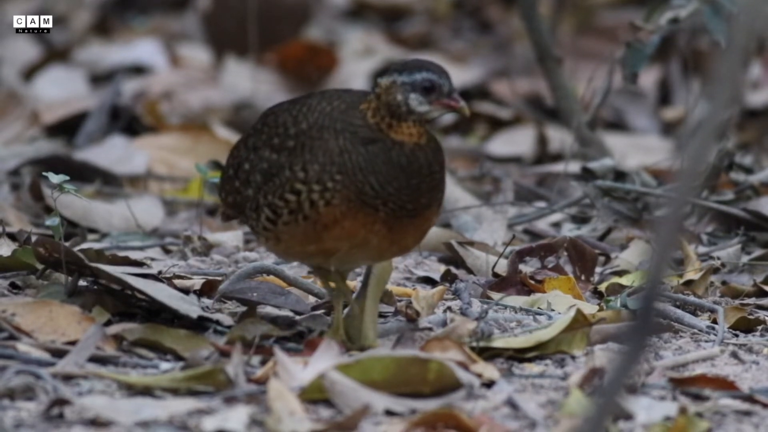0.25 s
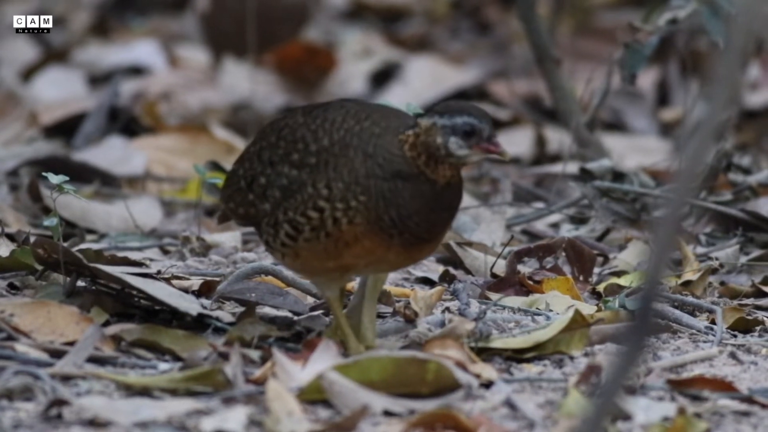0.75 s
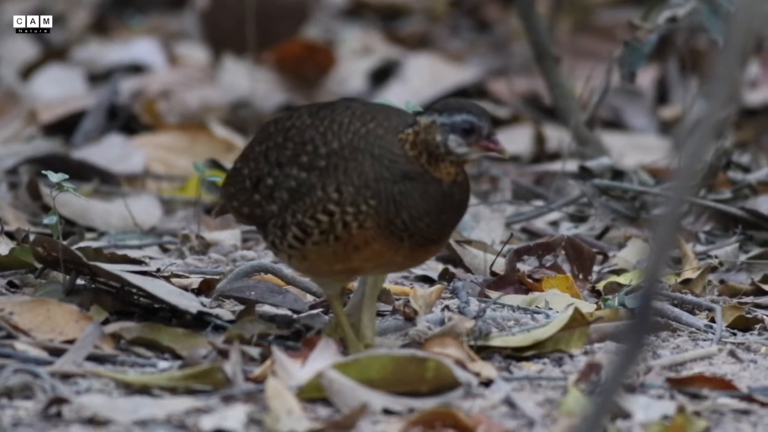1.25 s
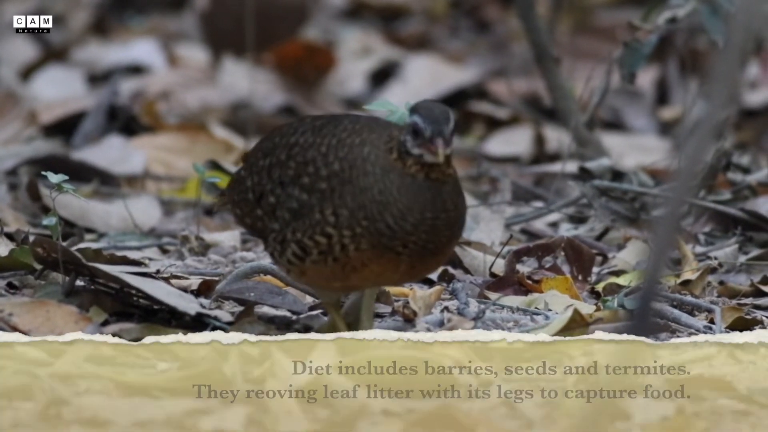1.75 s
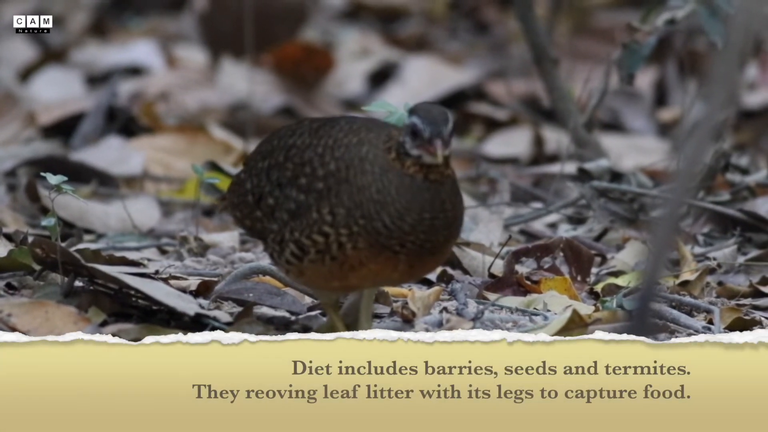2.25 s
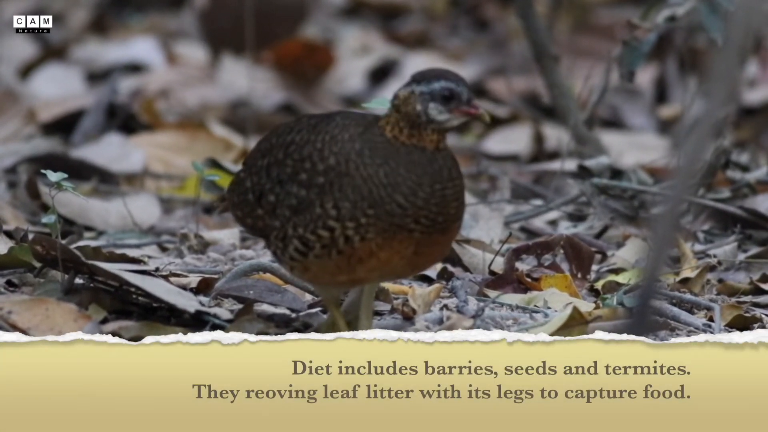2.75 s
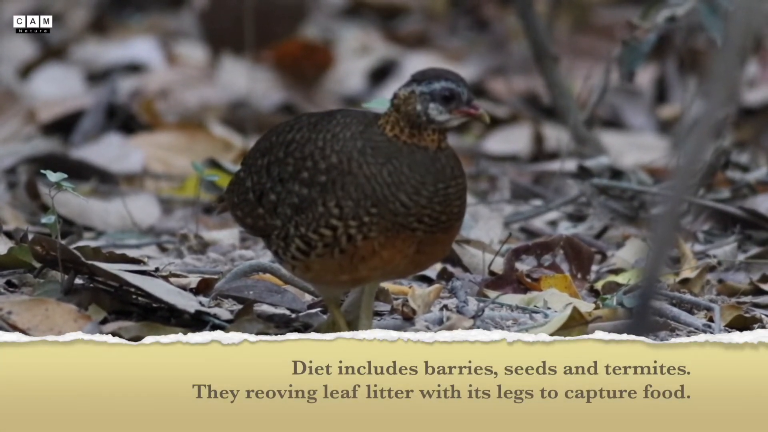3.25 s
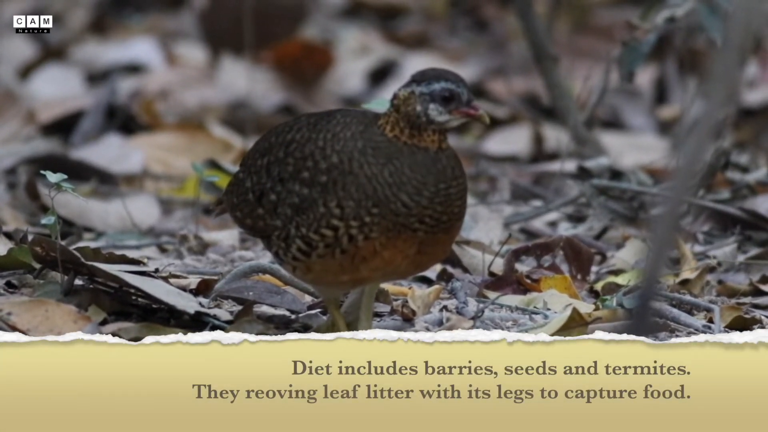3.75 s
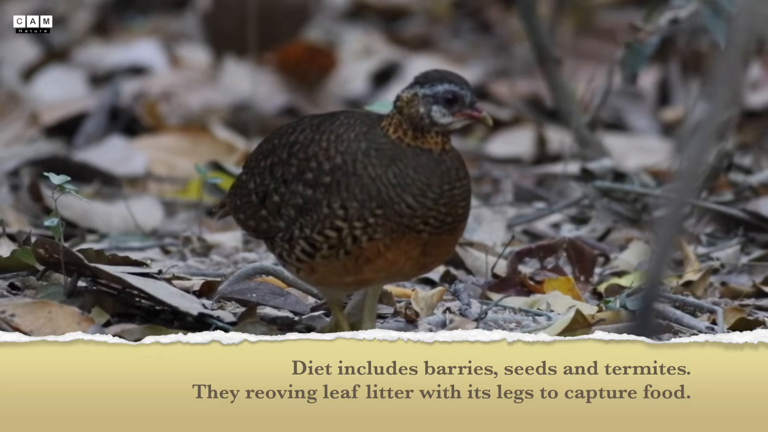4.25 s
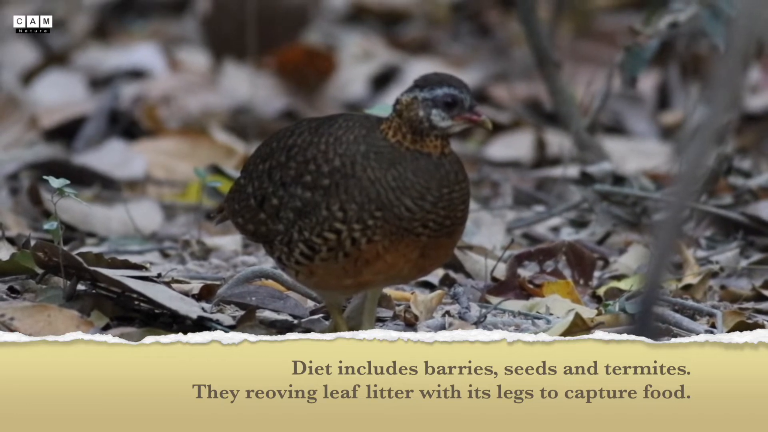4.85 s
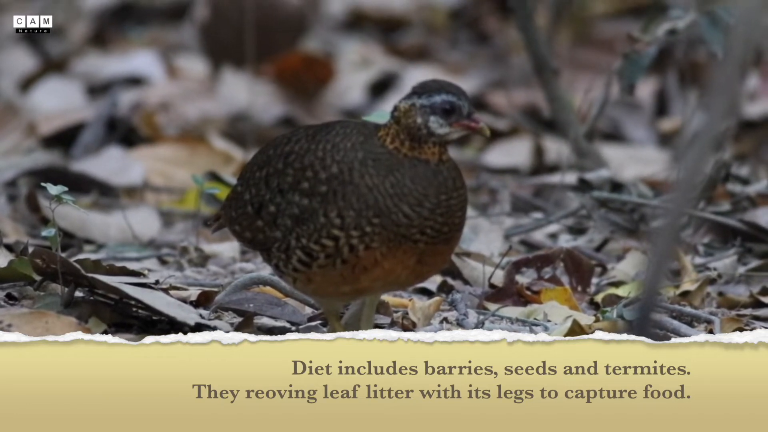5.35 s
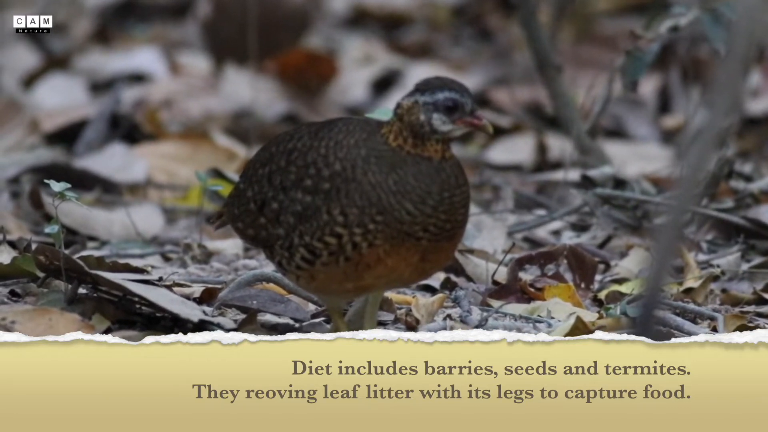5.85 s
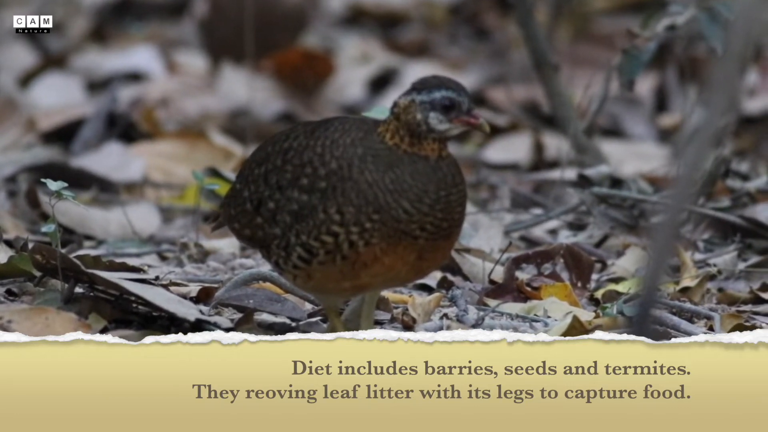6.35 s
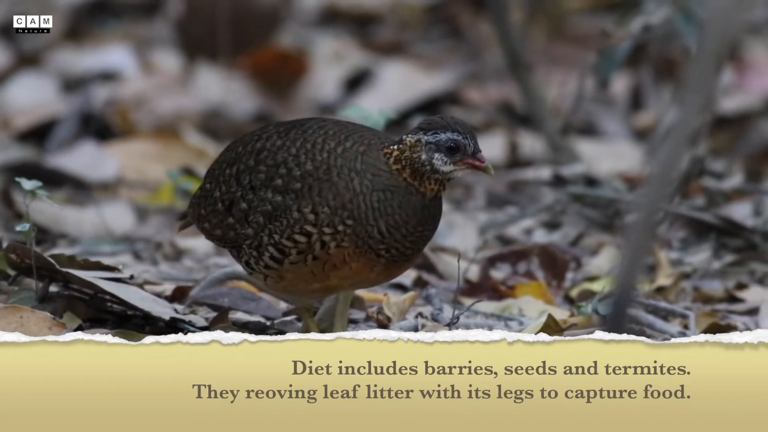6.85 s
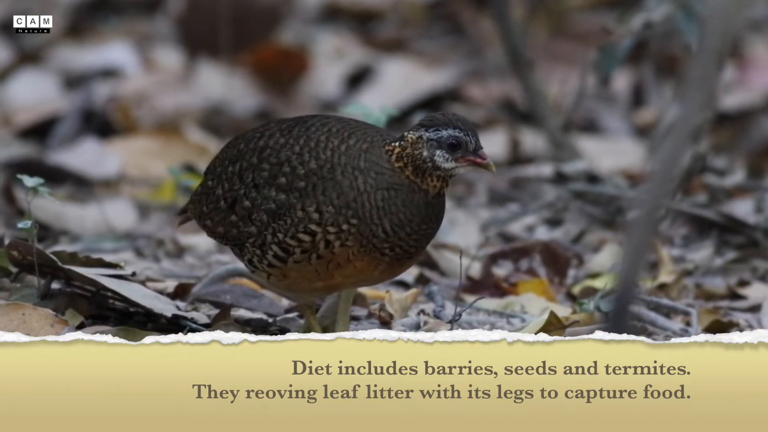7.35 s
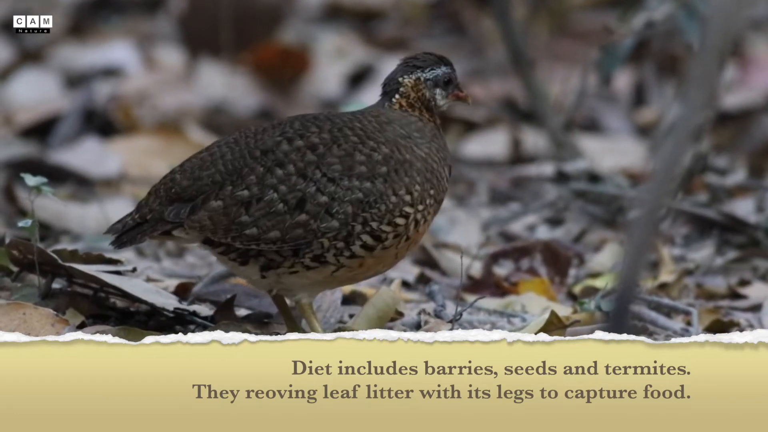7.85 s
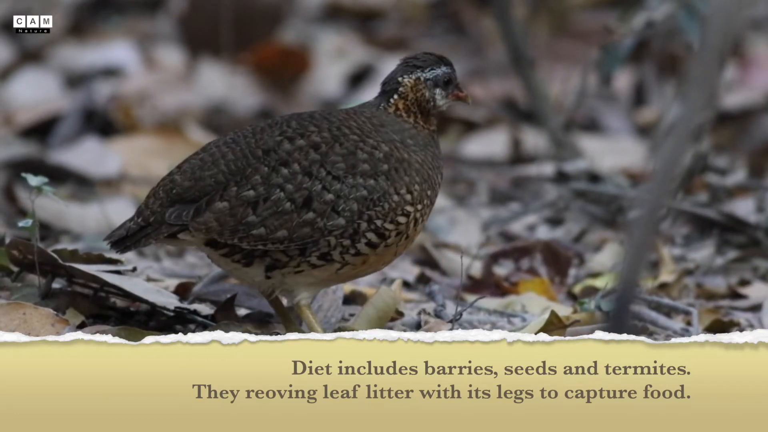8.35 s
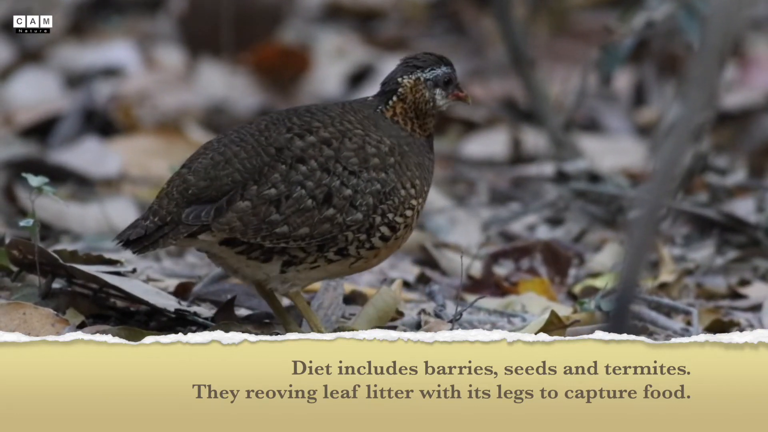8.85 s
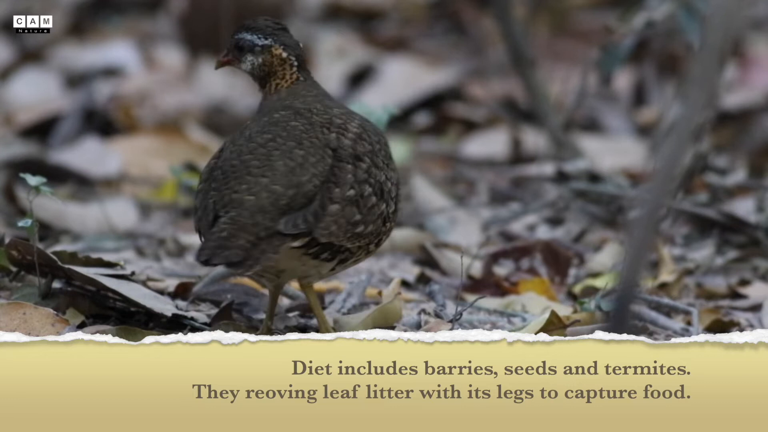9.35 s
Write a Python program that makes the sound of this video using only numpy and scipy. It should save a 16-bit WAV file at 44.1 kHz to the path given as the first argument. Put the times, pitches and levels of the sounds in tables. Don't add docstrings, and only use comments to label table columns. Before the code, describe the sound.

In dense woodland, overlapping bird whistles and a hoarse rasp begin at once. A nearer bird repeats a low sinking note answered by a higher arching one through the first half. A high cricket fades in, trills steadily, then stops dead near seven seconds. Small drips and dry twig cracks punctuate the leaf litter. Scattered echoes blur into a soft hum on a mono camera microphone.

```python
import sys
import numpy as np
from scipy import signal
from scipy.io import wavfile
from scipy.ndimage import uniform_filter1d

SR = 44100
rng = np.random.default_rng(int(sys.argv[2]) if len(sys.argv) > 2 else 0)


def decibels_to_gain(level_db):
    exponent = np.asarray(level_db, float) / 20
    return 10 ** exponent


def digitize_waveform(pressure):
    field = np.atleast_2d(pressure).T
    bounded = np.clip(field, -1, 1)
    quanta = np.round(bounded * 32767).astype(np.int16)
    wavfile.write(sys.argv[1], SR, quanta)


N = 422919


def evened(x):
    return x / np.sqrt(np.mean(x ** 2) + 1e-20)


def read(points, hz):
    f, value = np.transpose(points)
    return np.interp(np.log(hz + 1), np.log(f + 1), value)


def add(mix, s, sound):
    part = mix[round(s * SR):][:len(sound)]
    part += sound[:len(part)]


def unsteady(span):
    drift = uniform_filter1d(rng.standard_normal(N + SR), span)
    return evened(uniform_filter1d(drift, span))


def resonate(x, hz, width):
    turn = np.exp(2j * np.pi * np.cumsum(hz * np.ones(len(x))) / SR)
    r = np.exp(-np.pi * width / SR)
    return 2 * (turn * signal.lfilter([1 - r], [1, -r], x / turn + 1e-18)).real


def tone(hz, db, shimmer, taper):
    envelope = decibels_to_gain(db + shimmer) * signal.windows.tukey(len(hz), taper)
    return envelope * np.sin(2 * np.pi * np.cumsum(hz) / SR)


# t/s, f/Hz, level/dB
FALLING_NOTES = [
    (1.049, 1121, -40),
    (1.976, 1137, -42),
    (2.495, 1118, -41),
    (3.515, 1174, -39.5),
    (4.484, 1173, -39),
]
# t/s, length/s, f/Hz, level/dB
ARCHED_NOTES = [
    (.405, 0.083, 1544, -36),
    (1.195, 0.11, 1454, -39),
    (2.115, 0.12, 1499, -39.5),
    (2.64, 0.13, 1480, -40),
    (3.665, 0.095, 1517, -38),
    (4.63, 0.14, 1512, -39.5),
]
FALL = [(0, 1.11), (.4, 1), (.85, .99), (1, .86)]
ARCH = [(0, .9), (.17, 1), (.6, 1), (1, .94)]


def near_bird(falling_s=.142):
    out = np.zeros(N)
    waver, shimmer = .007 * unsteady(span=400), 2.7 * unsteady(span=300)
    falling = [(s, falling_s, hz, db) for s, hz, db in FALLING_NOTES]
    for notes, shape in ((falling, FALL), (ARCHED_NOTES, ARCH)):
        for s, length, hz, db in notes:
            u = np.linspace(0, 1, round(length * SR))
            bend = uniform_filter1d(np.interp(u, *np.transpose(shape)), 500, mode="nearest")
            now = slice(round(s * SR), round(s * SR) + len(u))
            add(out, s, tone(hz * bend * (1 + waver[now]), db, shimmer[now], .2))
    return out


# t/s, length/s, middle f/Hz, level/dB
STEADY = [(7.062, .026, 2270, -44), (2.208, .02, 1480, -38), (8.335, .02, 2300, -40),
          (7.27, .03, 2980, -47), (1.095, 0.088, 2104, -43), (3.045, .17, 2203, -40.5),
          (4.805, .058, 2520, -38.5), (4.94, .072, 1898, -45), (9.125, 0.056, 3080, -55.5)]
HELD = [(.078, 0.095, 2352, -43.5), (.26, 0.052, 1330, -39), (.325, 0.05, 2100, -45),
        (1.49, 0.032, 1920, -49.5), (.158, 0.075, 1718, -43.5), (.76, 0.14, 2432, -46.5),
        (2.393, 0.11, 1880, -47.5), (2.822, 0.068, 2440, -42.5), (4.44, 0.024, 2745, -42),
        (3.64, 0.094, 3400, -49), (3.822, 0.024, 2420, -48), (4.895, 0.043, 2490, -47),
        (6.295, 0.095, 1530, -39), (7.55, 0.042, 3220, -55), (8.255, 0.091, 2342, -41),
        (8.333, 0.077, 2213, -45.5), (9.11, 0.07, 1700, -59), (9.408, 0.029, 2440, -54),
        (9.47, 0.056, 1737, -58), (5.777, 0.05, 3050, -46.5), (6.999, .025, 2510, -53),
        (7.27, 0.057, 2940, -53), (7.9, .11, 2208, -42), (7.99, 0.069, 3640, -51), (8.39, 0.13, 2195, -61),
        (8.47, 0.044, 1874, -45.5), (8.529, 0.077, 3323, -45), (5.56, 0.087, 3230, -53.5)]
EASING_UP = [(5.21, .088, 1430, -41), (5.7, .09, 1420, -42), (6.195, .09, 1440, -41),
             (.225, 0.043, 3240, -50), (.428, 0.041, 1900, -47), (1.885, 0.2, 2423, -44.5),
             (5.639, 0.17, 1903, -46.5), (7.161, 0.022, 1835, -42.5), (7.45, 0.16, 2290, -44),
             (7.505, 0.165, 4190, -49)]
SCOOPING = [
    (0, 0.16, 3294, -46),
    (6.565, 0.024, 2420, -42.5),
    (6.88, 0.051, 2154, -44),
    (6.93, 0.033, 1850, -43),
    (8.626, 0.1, 2054, -51),
]
CLIMBING = [(2.044, 0.053, 2280, -47), (4.348, 0.03, 2340, -45.5), (2.985, 0.073, 2006, -46.5),
            (4.42, 0.14, 2010, -51), (5.186, 0.011, 2270, -39.5), (5.262, 0.047, 1876, -46),
            (6.4, 0.141, 1747, -47.5), (7.211, 0.045, 3220, -45.5), (8.447, 0.078, 1610, -49.5),
            (8.565, 0.084, 1865, -44)]
SETTLING = [
    (1.82, 0.076, 2300, -45),
    (2.032, 0.051, 1630, -52),
    (6.72, 0.0745, 1686, -47),
    (7.993, 0.09, 2053, -48.5),
]
SAGGING = [
    (0, 0.074, 2790, -46),
    (1.139, 0.041, 1770, -45),
    (1.557, 0.031, 1707, -43.5),
    (5.601, 0.047, 1702, -38),
    (6.966, 0.088, 1645, -45.5),
    (6.982, 0.024, 3330, -44),
]
DROOPING = [(.078, 0.042, 1623, -43), (.373, 0.086, 1804, -45.5), (.758, 0.071, 1684, -49),
            (1.372, 0.049, 1700, -50.5), (2.25, 0.074, 1720, -55), (.93, 0.072, 1685, -49.5),
            (4.136, 0.083, 1730, -43), (4.73, 0.098, 1704, -42.5), (4.476, 0.093, 2250, -47.5),
            (5.302, 0.07, 2153, -39), (5.31, 0.0826, 1557, -37.5), (5.8, 0.087, 1550, -37.5),
            (6.638, 0.025, 2055, -43.5), (7.33, 0.039, 2530, -47), (8.795, 0.029, 2800, -42.5)]
HOOKING = [(0, 0.049, 1790, -44), (.056, 0.026, 2530, -41), (.096, 0.038, 1320, -43),
           (1.6, 0.056, 1570, -52), (.365, 0.029, 1210, -40.5), (2.5, 0.15, 1663, -47),
           (2.83, 0.097, 1727, -45), (3.09, 0.11, 1730, -43.5), (3.57, 0.11, 1804, -45.5),
           (6.79, 0.041, 1542, -55), (1.812, 0.1, 1646, -47.5), (3.204, 0.13, 1850, -44),
           (3.295, 0.039, 1450, -39), (3.364, 0.045, 1745, -45), (3.807, 0.1, 1772, -45),
           (4.204, 0.077, 1757, -49), (4.274, 0.028, 1430, -39), (4.868, 0.066, 2283, -43),
           (7.235, 0.057, 2810, -42), (8.164, 0.053, 1510, -53), (8.544, 0.044, 2990, -45),
           (8.712, 0.054, 1585, -47)]
# t/s, length/s, start f/Hz, end f/Hz, level/dB
SWEEPS = [(0.26, .125, 3260, 2950, -41), (0.369, .125, 2984, 2480, -48), (0.614, 0.028, 2116, 2524, -41.5),
          (0.699, 0.065, 1973, 2520, -42), (1.447, 0.077, 2750, 1920, -54), (1.02, .085, 1750, 2075, -46),
          (1.54, .042, 2000, 2950, -44), (1.575, .068, 2880, 3540, -44), (1.885, .045, 1550, 1180, -49),
          (2.773, 0.072, 1893, 2420, -44), (2.903, 0.071, 2950, 3300, -52), (3.492, .15, 2816, 3450, -48),
          (4.745, .035, 2900, 2250, -49), (4.762, .052, 2900, 2520, -42.5), (5.09, .035, 1950, 1400, -52),
          (7.386, 0.075, 1880, 2156, -49), (7.486, 0.06, 3760, 3900, -55), (3.755, 0.23, 3333, 2516, -42.5),
          (6.936, 0.047, 2034, 2575, -44), (6.981, 0.03, 2490, 3370, -41.5),
          (6.229, 0.06, 1790, 1590, -41.5), (7.83, 0.045, 2780, 2144, -46),
          (8.197, 0.088, 1760, 2205, -50.5), (9.063, 0.048, 2700, 1850, -53.5),
          (9.395, 0.04, 3050, 2300, -54)]


def whistles(risen_by_middle=.62, fallen_by_middle=.42):
    out = np.zeros(N)
    waver, shimmer = .005 * unsteady(span=300), 2.5 * unsteady(span=300)
    shapes = [(STEADY, .975, .99), (HELD, 1.002, .97), (EASING_UP, .93, 1),
              (SCOOPING, .895, 1.02), (CLIMBING, .98, 1.057), (SETTLING, 1.067, .98),
              (SAGGING, 1.007, .925), (DROOPING, 1.057, .94), (HOOKING, 1.075, .855)]
    notes = []
    for rows, start, end in shapes:
        notes += [(s, length, start * hz, hz, end * hz, db) for s, length, hz, db in rows]
    for s, length, a, b, db in SWEEPS:
        done = risen_by_middle if b > a else fallen_by_middle
        notes.append((s, length, a, a + done * (b - a), b, db))
    for s, length, start_hz, middle_hz, end_hz, db in notes:
        u = np.linspace(0, 1, round(length * SR))
        now = slice(round(s * SR), round(s * SR) + len(u))
        hz = start_hz * (1 - u) * (1 - 2 * u) + 4 * middle_hz * u * (1 - u) + end_hz * u * (2 * u - 1)
        add(out, s, tone(hz * (1 + waver[now]), db, shimmer[now], .28))
    return out


# t/s, length/s, start f/Hz, level/dB
BROAD_RASPS = [(0.008, 0.127, 3820, -52.5), (1.417, 0.21, 3320, -57), (2.16, 0.13, 3800, -53.5),
               (3.695, 0.28, 4000, -55), (4.162, 0.066, 2660, -50), (6.166, 0.19, 3860, -52.5),
               (6.442, 0.086, 7000, -57.5), (6.78, 0.08, 6830, -54), (7.969, 0.11, 3900, -49),
               (9.08, 0.25, 3890, -59), (9.356, 0.17, 4000, -56)]
TIGHT_RASPS = [(1.14, 0.045, 2400, -50), (5.915, 0.079, 2700, -53), (6.07, .085, 2300, -51.5),
               (6.09, .07, 3050, -55), (9.065, .06, 2450, -57), (10, .055, 2600, -55),
               (9.25, .05, 2750, -59), (8.86, .07, 1800, -59), (1.417, 0.12, 3940, -56),
               (1.459, 0.059, 2530, -63), (2.119, 0.11, 2940, -52), (3.157, 0.052, 2500, -56),
               (6.985, 0.074, 3000, -52), (7.25, 0.146, 2260, -56), (7.83, 0.086, 2500, -52),
               (8.19, .07, 2280, -49), (5.062, 0.051, 2000, -52.5), (5.6, 0.065, 4230, -53.5),
               (7.022, 0.123, 3780, -52)]
THIN_RASPS = [(7.005, .05, 3150, -49), (4.18, .07, 1700, -53), (6.64, .04, 2050, -51),
              (6.07, .08, 1500, -54), (1.16, .12, 1680, -52), (2.8, .1, 2150, -49.5),
              (3.21, 0.087, 1870, -50), (3.39, .055, 1700, -50.5), (8.797, .06, 2820, -51),
              (4.89, .08, 2100, -54), (5.1, 0.076, 2370, -54), (.7, 0.065, 2200, -52),
              (1.65, .06, 3150, -56), (.39, .09, 1900, -55), (4.163, 0.324, 1690, -51.5),
              (8.2, .17, 4130, -59), (8.46, 0.31, 1940, -58), (5.98, 0.061, 4100, -52),
              (6.13, 0.07, 4280, -49.5), (6.345, 0.078, 4000, -48.5), (6.54, 0.1, 3980, -50.5),
              (6.76, 0.082, 3760, -49.5)]


def rasps(buzz_hz=140, rough=0.95, end_factor=0.99):
    out = np.zeros(N)
    wobble = evened(uniform_filter1d(rng.standard_normal(N + SR), 400))
    beat = np.cumsum(buzz_hz * (1 + 0.38 * wobble)) / SR
    breath = (rough + np.exp(-(beat % 1) / 0.14)) * rng.standard_normal(N + SR)
    for rows, spread_hz in ((BROAD_RASPS, 1210), (TIGHT_RASPS, 870), (THIN_RASPS, 530)):
        for s, length, start_hz, db in rows:
            part = breath[round(s * SR):][:round(length * SR)]
            hz = np.linspace(start_hz, end_factor * start_hz, len(part))
            for _ in range(3):
                part = resonate(part, hz, 2 * spread_hz)
            add(out, s, decibels_to_gain(db) * evened(part) * signal.windows.tukey(len(part), .25))
    return out


# t/s, level/dB, wing f/Hz
CRICKET = [
    (0, -66, 6640),
    (.8, -62, 6630),
    (1.0, -56, 6660),
    (2.4, -53, 6750),
    (4.5, -53, 6760),
    (6.988, -54, 6720),
    (6.995, -95, 6720),
]
# t/s, lead/strokes
STROKE_LEAD = [(.75, -.16), (1.25, -.12), (2.1, -.2), (2.75, 0), (3.75, .21), (5.0, .38), (5.75, .41),
               (6.25, .38), (6.9, .27)]


def cricket(strokes_per_s=42.5, stroke_s=.0095, sag=.055, octave_db=-26):
    t = np.arange(N) / SR
    s, db, hz = np.transpose(CRICKET)
    beat = strokes_per_s * t + np.interp(t, *np.transpose(STROKE_LEAD))
    since = ((beat + .5) % 1 - .5) / strokes_per_s
    u = np.clip(since / stroke_s, -.5, .5)
    uneven = 1 + 0.002 * evened(uniform_filter1d(rng.standard_normal(N), 800))
    turn = 2 * np.pi * np.cumsum(np.interp(t, s, hz) * uneven * (1 - sag * u)) / SR
    stroke = np.cos(np.pi * u) ** 2 * (np.sin(turn) + decibels_to_gain(octave_db) * np.sin(2.03 * turn))
    return decibels_to_gain(np.interp(t, s, db)) * evened(stroke)


# t/s, peak level/dB, ring f/Hz
DRIPS = [(0.762, -47, 605), (1.924, -41.5, 706), (2.023, -36, 1730), (2.0235, -38, 4700), (2.193, -50, 486),
         (2.965, -44.5, 700), (3.367, -44, 720), (3.369, -35.5, 2840), (3.368, -40, 4200),
         (4.753, -47, 764), (5.246, -48, 756), (6.032, -44.5, 894), (6.787, -46, 897), (7.524, -48, 870),
         (7.931, -40, 740), (8.143, -44.5, 696), (8.862, -45, 621), (9.151, -51, 1140), (9.275, -52, 2410),
         (9.392, -42.5, 1200)]


def drips(ring_s=.018, splash_db=0, gain_db=3):
    out, t = np.zeros(N), np.arange(2000) / SR
    splashes = rng.standard_normal((len(DRIPS), len(t)))
    for (s, db, hz), splash in zip(DRIPS, splashes):
        dull = evened(resonate(resonate(splash, 1100, 2600), 1300, 5000))
        ring = np.sin(2 * np.pi * hz * t) + decibels_to_gain(splash_db) * dull
        add(out, s, decibels_to_gain(db + gain_db - 60 * t / ring_s) * np.clip(t / 0.00046, 0, 1) * ring)
    return signal.sosfilt(signal.butter(2, 380, "high", fs=SR, output="sos"), out)


# t/s, peak level above 8 kHz/dB, relative level of the duller part/dB
SNAPS = [(0.329, -54.5, 17), (1.722, -41.5, -12), (2.022, -53.5, 18), (3.244, -38, -12),
         (3.3674, -46.5, 5.5), (3.847, -36.5, -10), (4.179, -59, 9), (4.379, -48, 5), (5.106, -39, -12),
         (5.5396, -49, -10), (6.125, -55, 10), (6.788, -53.5, -4), (7.4168, -43.5, -4), (7.8355, -44, -7),
         (9.5625, -58, 8)]


def snaps(crack_s=.008, dull_hz=4500, gain_db=.5):
    out, t = np.zeros(N), np.arange(1200) / SR
    bursts = rng.standard_normal((len(SNAPS), 2, len(t)))
    for (s, db, dull_db), (thin, thick) in zip(SNAPS, bursts):
        body = evened(resonate(resonate(thick, dull_hz, 4000), dull_hz, 4000))
        crack = .7 * resonate(thin, 9000, 6500) + decibels_to_gain(dull_db + 5) * body
        add(out, s, decibels_to_gain(db + gain_db - 60 * t / crack_s) * crack)
    return out


# t/s, level/dB
FAR_CRICKETS = [
    (0, -57),
    (1, -57),
    (2.502, -54.5),
    (5, -82),
    (7, -67),
    (8, -61.5),
    (9.59, -64.5),
]


def far_crickets(wing_hz=6600, spread_hz=330, strokes_per_s=500):
    strokes = (rng.random(N) < strokes_per_s / SR) * rng.standard_normal(N)
    strokes = strokes + 0.15 * rng.standard_normal(N)
    band = resonate(resonate(strokes, wing_hz, spread_hz), wing_hz, 2 * spread_hz)
    return decibels_to_gain(np.interp(np.arange(N) / SR, *np.transpose(FAR_CRICKETS))) * evened(band)


# f/Hz, level per Hz/dB
FLOOR = [(30, -35), (44, 3.5), (64, -1), (110, -7), (300, -17.5), (900, -20), (1500, -16.5), (2800, -15),
         (3600, -25), (4400, -15), (5700, -28), (7500, -28.5), (10500, -45), (14500, -39.5)]
# t/s, level/dB
FAR_CHORUS = [
    (0, 3),
    (3, 0.5),
    (6, 4.5),
    (8, 1.5),
    (9.59, 0),
]
# middle t/s, half length/s, rise/dB
SWELLS = [
    (3.798, 0.24, 2.5),
    (6.907, 0.43, 0.5),
]


def forest_hum(floor_db=-49.5, patchy_db=1.2, gust_db=1.2):
    frames, hz = N // 256 + 5, np.fft.rfftfreq(1024, 1 / SR)
    a, b, patches = rng.standard_normal((frames, 513, 3)).T
    patches = evened(uniform_filter1d(uniform_filter1d(patches, 10, 0), 14, 1))
    t = np.arange(frames) * 256 / SR
    rumble_db = gust_db * evened(uniform_filter1d(rng.standard_normal(frames), 40))
    for s, half, db in SWELLS:
        rumble_db = rumble_db + db * np.exp(-((t - s) / half) ** 2)
    patches_db = patchy_db * (1 + (hz[:, None] / 17000) ** 2) * patches
    chorus_db = np.interp(t, *np.transpose(FAR_CHORUS)) + patches_db
    chorus_share = np.clip(np.log2(hz / 700 + 1e-9), 0, 1)[:, None]
    level_db = read(FLOOR, hz)[:, None] + chorus_share * chorus_db + (1 - chorus_share) * rumble_db
    hum = signal.istft((a + 1j * b) * decibels_to_gain(level_db), nperseg=1024, noverlap=768)[1][:N]
    return decibels_to_gain(floor_db) * evened(hum)


# f/Hz, t60/s
WOODS = [(500, 0.12), (1500, .85), (3000, 0.9), (6500, .6), (12000, 0.43)]


def among_trees(x, wet_db, first_s):
    slots = np.arange(0, SR - 22, 22)
    places = slots + rng.integers(0, 22, (3, len(slots)))
    taps = np.zeros((3, SR))
    np.put_along_axis(taps, places, rng.choice([-1., 1.], (3, len(slots))), 1)
    hz, t, z = signal.stft(taps, SR, nperseg=256)
    onset = np.clip(t / first_s, 0, 1) ** 2
    decay = decibels_to_gain(-60 * t / read(WOODS, hz)[:, None])
    tails = signal.istft(z * onset * decay, SR, nperseg=256)[1]
    sway = 2 * np.pi * (13 * np.arange(N) / SR + .2 * unsteady(span=4000)[:N])
    shares = np.sqrt(2 / 3) * np.cos(sway + 2 * np.pi / 3 * np.arange(3)[:, None])
    wet = signal.fftconvolve(x * shares, tails / np.linalg.norm(tails[0]), axes=1)[:, :N].sum(0)
    return x + decibels_to_gain(wet_db) * wet


def scene():
    near = among_trees(near_bird(), wet_db=-7.5, first_s=.015)
    far = among_trees(whistles() + rasps(), wet_db=-1.3, first_s=.012)
    insects = among_trees(cricket(), wet_db=-13, first_s=.002) + far_crickets()
    ticks = among_trees(snaps() + drips(), wet_db=-3.0, first_s=.0025)
    return (near + far + insects + ticks + forest_hum())[None]


# t/s, length/s
SILENCED = [(1.04, .32), (1.44, .26), (1.79, .05), (1.96, .05), (2.08, .16), (2.38, .15), (2.75, .26),
            (3.05, .07), (3.16, .09), (3.44, .14), (4.1, .06), (4.21, .1), (4.57, .06), (4.96, .1),
            (5.17, .32), (5.56, .09), (5.79, .1), (5.94, .15), (6.62, .07), (6.96, .03)]
# lowest f/Hz, highest f/Hz
SILENCED_BAND_HZ = (7170, 11950)
# f/Hz, share
LOST = [(7200, 0), (7400, .3), (9500, .45), (11800, .35), (12200, .08), (13000, 0), (13900, 0),
        (14300, .12), (15800, .28)]


def treble_gaps(x):
    hz, t, z = signal.stft(x, SR, nperseg=1024, noverlap=768)
    inside = ((hz > SILENCED_BAND_HZ[0]) & (hz < SILENCED_BAND_HZ[1]))[:, None]
    silenced = sum((t > s - .005) & (t < s + length + .005) for s, length in SILENCED) > 0
    spans = len(t) // 6 + 1
    luck = rng.random((spans, 43)).T ** decibels_to_gain(3 * rng.standard_normal(spans))
    luck = np.repeat(np.repeat(luck, 12, 0), 6, 1)[:len(hz), :len(t)]
    trilling = np.where((t > CRICKET[1][0]) & (t < CRICKET[-1][0]), 1, .07)
    level = abs(z[0, hz > 8000]).mean(0)
    calm = level < 2.5 * np.median(level)
    scattered = (luck < read(LOST, hz)[:, None] * np.where(inside, trilling, 1)) & calm
    lost = scattered | (inside & silenced)
    return signal.istft(z * ~lost, SR, nperseg=1024, noverlap=768)[1][:, :N]


def roll_off(x):
    return signal.sosfilt(signal.butter(12, 15810, fs=SR, output="sos"), x)


def record(dry):
    kept = signal.sosfilt(signal.butter(3, 38, "high", fs=SR, output="sos"), dry)
    return roll_off(treble_gaps(kept))


dry = scene()
out = record(dry)
digitize_waveform(out)
```